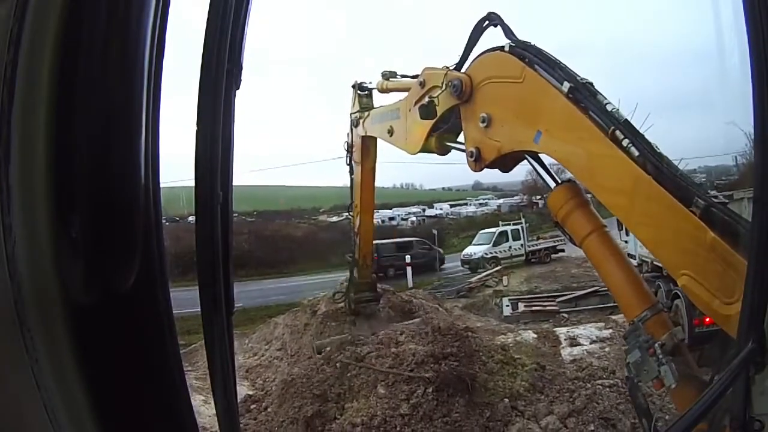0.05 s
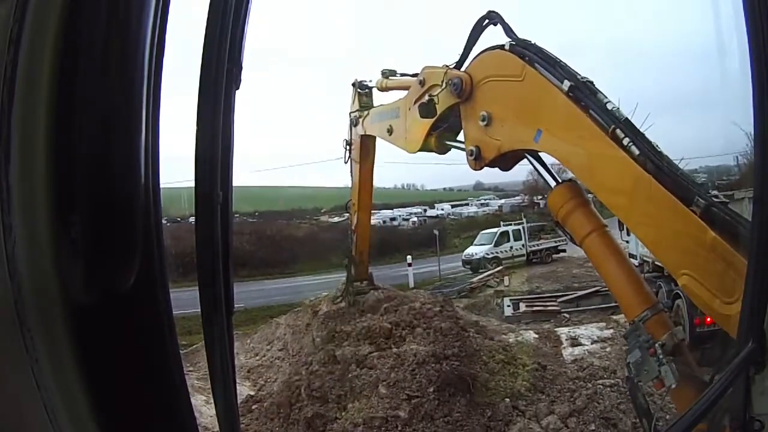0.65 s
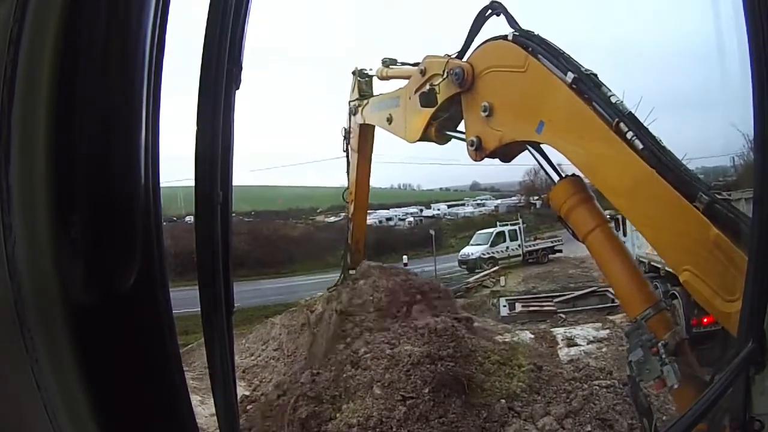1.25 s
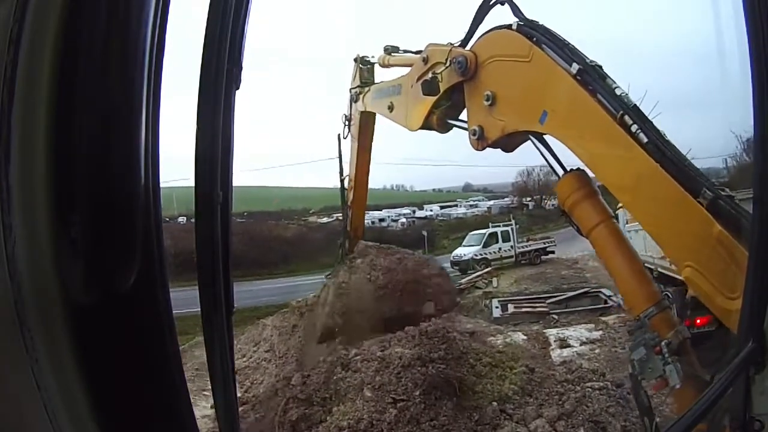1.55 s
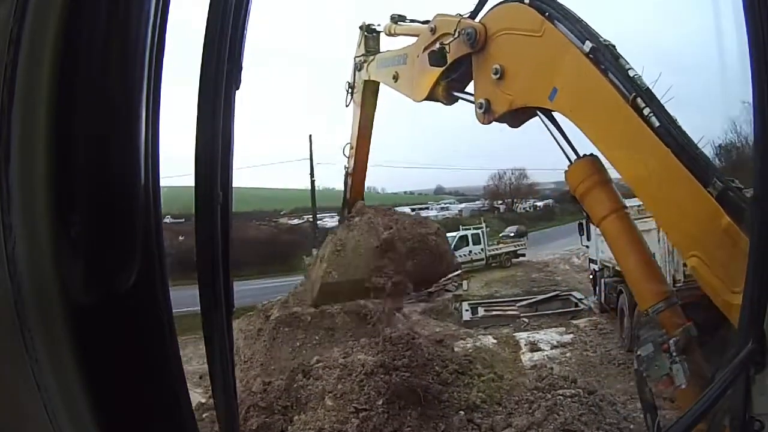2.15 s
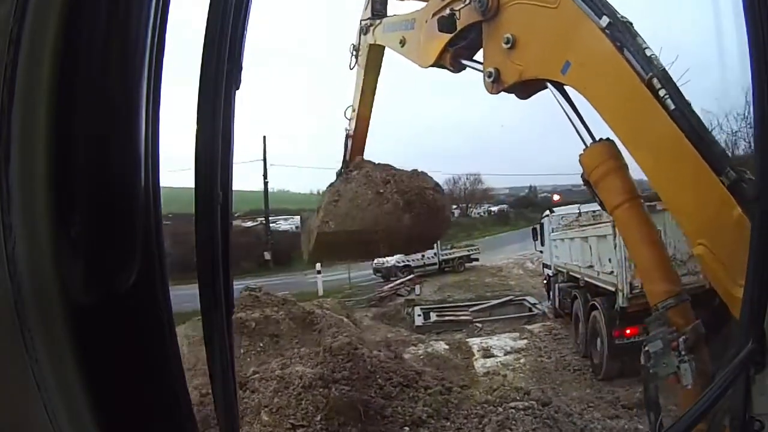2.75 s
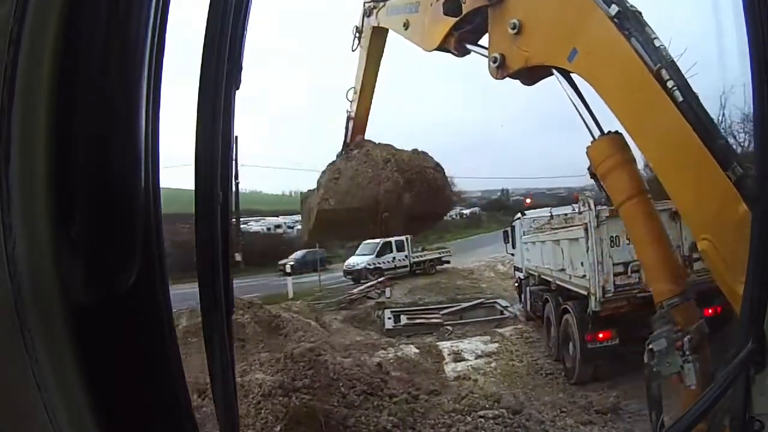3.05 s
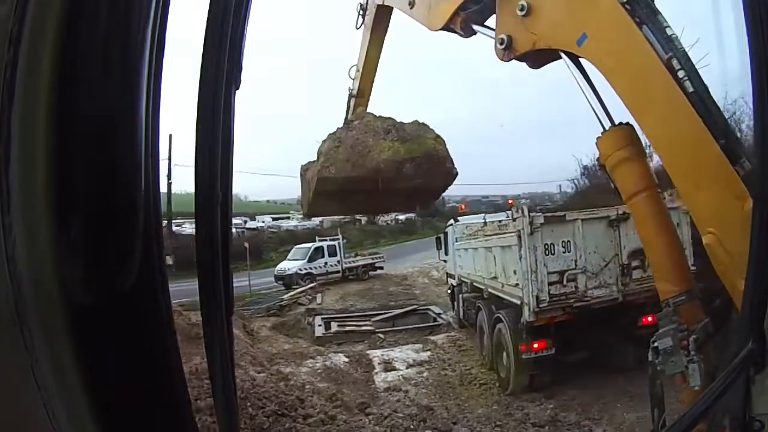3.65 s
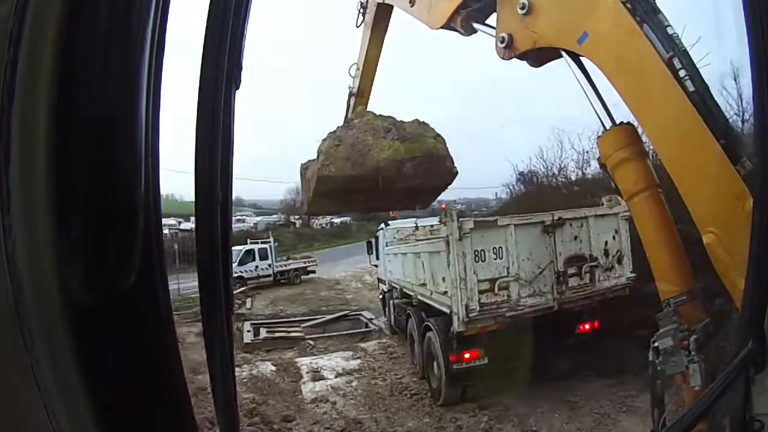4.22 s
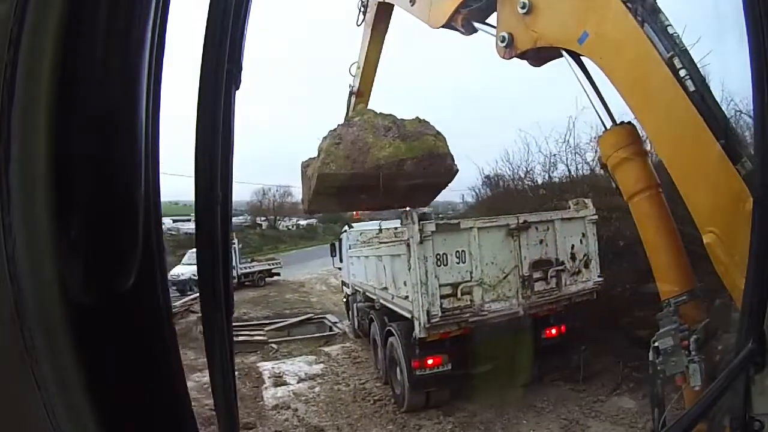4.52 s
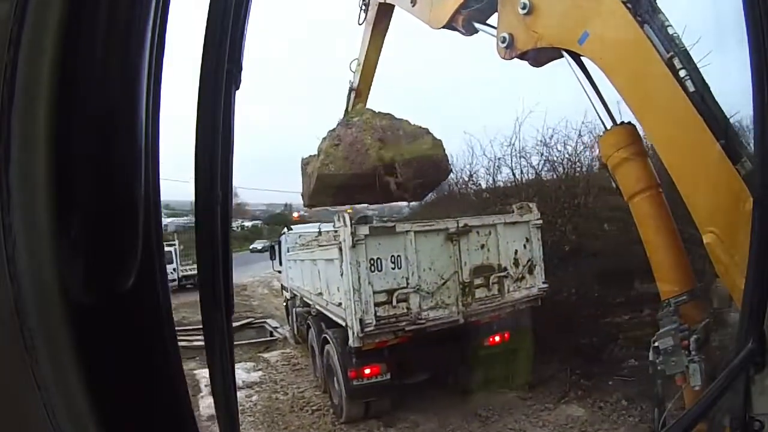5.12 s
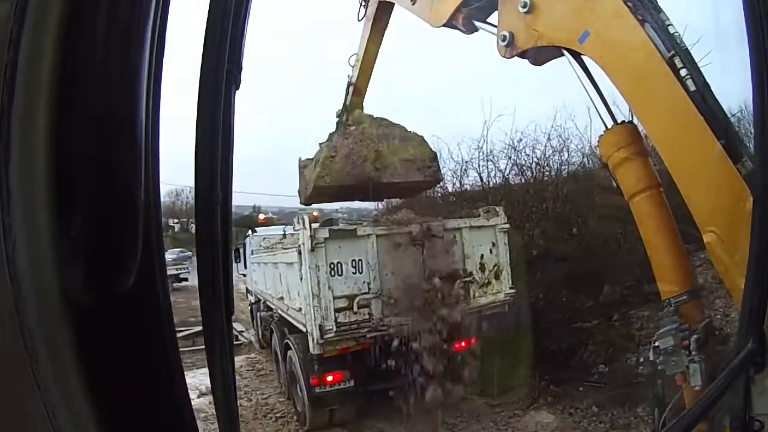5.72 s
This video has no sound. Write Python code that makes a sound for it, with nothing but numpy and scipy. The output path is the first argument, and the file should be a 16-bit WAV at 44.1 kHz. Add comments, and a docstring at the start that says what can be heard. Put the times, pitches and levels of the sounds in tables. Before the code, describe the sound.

A working excavator is heard from within its cab: a deep diesel hum, hydraulic whine and muffled engine clatter, wavering slightly under load. Dull metal knocks and booming jolts come at the start as it digs and lifts, then the sound settles through the swing. Late on, a valve spits, a dry joint squeaks and the first earth falls onto a truck with a low drumming.

```python
"""Inside an excavator cab

A wheeled excavator lifts a full bucket and swings it over a truck. A four-cylinder diesel near
1900 rpm, sagging under load, drives a whining piston pump and a seven-pulse hum. Four lever strokes
(dig, lift, swing, tip) load the hydraulics, and jolts set the cab booming and rumbling. Linkages
knock, valves spit, and a joint squeaks as the bucket tips and the first earth falls."""
import sys
import numpy as np
from scipy import signal
from scipy.fft import rfft, irfft
from scipy.io import wavfile
from scipy.ndimage import map_coordinates

SR = 44100
rng = np.random.default_rng(int(sys.argv[2]) if len(sys.argv) > 2 else 0)


def put_to_file(sound):
    """Save the sound as 16-bit audio at rate SR, in the file named by the first command-line argument."""
    columns = np.atleast_2d(sound).T  # one column per channel
    safe = np.clip(columns, -1, 1)
    whole_steps = np.round(safe * 32767)
    wavfile.write(sys.argv[1], SR, whole_steps.astype(np.int16))


N = 254898
T = np.arange(N) / SR
HZ = np.fft.rfftfreq(N, 1 / SR)
FIRINGS_PER_TURN, PUMP_PER_TURN, DRIVE_PER_TURN = 2, 12.2796, 7

# crankshaft speed: time_s, speed_hz
CRANK_SPEED = [(0.0, 31.62), (0.4, 31.72), (0.68, 32.23), (1.1, 31.46), (1.42, 31.28), (1.9, 31.67),
               (2.34, 31.55), (2.75, 31.67), (3.1, 31.57), (3.33, 31.8), (3.67, 31.95), (4.15, 31.63),
               (4.39, 31.62), (4.79, 31.99), (5.18, 31.76), (5.42, 31.81), (5.67, 32.43), (5.78, 32.45)]
# jolts that set the cab booming above the firing rate and the frame shaking:
# start_s, boom_db, boom_fade_db_per_s, above_hz, shake_db, shake_fade_db_per_s, tilt_db_per_octave
JOLTS = [(0.1, -27, 17, 6.8, -27, 20, 1.5), (0.86, -25, 11, 8.1, -39.5, 6.5, -1.5),
         (1.26, -26.5, 10.5, 6.45, -34, 11.5, 2.5), (4.38, -40, 6, 3.6, -39, 5.5, 0)]
# lever strokes: start_s, end_s, opening_s, closing_s
DIG, LIFT = (-0.31, 0.42, 0.029, 0.67), (0.67, 2.4, 0.42, 1.9)
SWING, TIP = (0.5, 4.35, 0.73, 0.3), (4.47, 4.74, 0.07, 2.2)


def amp(db):
    """Amplitude ratio of a level in decibels."""
    return np.exp(np.asarray(db) * (np.log(10) / 20))


def unit(x):
    """Normalisation to rms 1."""
    return x / np.sqrt(np.mean(abs(x) ** 2) + 1e-20)


def spectrum(points):
    """A spectral envelope in dB, interpolated on a log-frequency axis."""
    hz, db = np.transpose(points)
    return np.interp(np.log(HZ + 1), np.log(hz + 1), db)


def colour(x, db):
    """Filtering gives a white signal of rms 1 a spectral density in dB."""
    return irfft(rfft(x) * amp(db), N) * np.sqrt(SR / 2)


def noise(db):
    """Gaussian noise of a given spectral density."""
    return colour(rng.standard_normal(N), db)


def ringing(modes):
    """Random excitation of resonances with steep skirts."""
    power = sum(amp(db) ** 2 / (1 + ((HZ - hz) / (0.52 * width)) ** 2) ** 2 for hz, width, db in modes)
    return noise(10 * np.log10(power + 1e-20))


def drift(rate_hz):
    """Low-pass random fluctuation of rms 1."""
    size = 6000
    hz = np.fft.rfftfreq(size, T[-1] / size)
    slow = irfft(rfft(rng.standard_normal(size)) / (1 + (hz / rate_hz) ** 2), size)
    return np.interp(T, np.linspace(0, T[-1], size), unit(slow))


def tone(cycles, db, flutter, rate_hz):
    """A sinusoid with random amplitude and phase modulation."""
    phase = 2 * np.pi * (cycles + rng.random()) + flutter * drift(rate_hz)
    return amp(db) * (1 + flutter * drift(rate_hz)) * np.sqrt(2) * np.cos(phase)


def stroke(start_s, end_s, opening_s, closing_s):
    """A raised-cosine envelope: opens to 1, holds until end_s, then closes."""
    ramp = np.clip(np.minimum((T - start_s) / opening_s, 1 - (T - end_s) / closing_s), 0, 1)
    return np.sin(np.pi / 2 * ramp) ** 2


def jolted(blows, rest_db, rise_s=0.072):
    """Envelope of a damped vibration: each blow raises it, and it decays exponentially to a floor."""
    swells = [np.clip((T - s) / rise_s, 0, 1) * amp(db - fade * np.maximum(T - s, 0))
              for s, db, fade in blows]
    return np.maximum(np.max(swells, axis=0), amp(rest_db))


def engine(crank, lugging):
    """Periodic forcing: firing, shafts and gears sound at fixed multiples of the crank speed."""
    # engine and gear tones: order, level_db
    orders = [(1, -41.4), (2, -23.2), (3, -57.8), (3.5, -60.6), (4, -49.6), (5, -60.6), (5.5, -60.7),
              (6, -60.7), (6.5, -51.0), (8, -51.8), (11, -61.4), (12, -49.8), (13, -58.8), (13.3, -49.5),
              (20, -56.6), (23, -65.8), (24, -53.6), (25, -64.7), (26, -64.8), (31, -63.6), (34, -73.9),
              (39, -71.4), (40, -68.1), (40.5, -71.5), (42.5, -71.5), (44, -59.6), (48, -69.9), (53, -63.1),
              (57.08, -69.9), (61, -76.0), (69, -77.5)]
    out = np.zeros(N)
    for order, db in orders:
        if order == FIRINGS_PER_TURN:
            level = amp(db + 0.2 - 2 * lugging) * (1 + 0.09 * drift(11))
            out += level * np.sqrt(2) * np.cos(2 * np.pi * order * crank)
        else:
            out += tone(order * crank, db - 0.2, flutter=0.15, rate_hz=4.6)
    return out


def cab_boom(crank, antiphase_s=1.262):
    """Beating: each jolt renews a boom just above the firing note, and the two throb together."""
    starts, boom_db, fades, above_hz = np.transpose(JOLTS)[:4]
    latest = np.maximum(np.searchsorted(starts, T) - 1, 0)
    slip = np.cumsum(above_hz[latest]) / SR
    slip -= np.interp(antiphase_s, T, slip)
    envelope = jolted(zip(starts, boom_db, fades), rest_db=-42)
    return -envelope * np.sqrt(2) * np.cos(2 * np.pi * (FIRINGS_PER_TURN * crank + slip))


def hydraulics(crank, speed_hz, labouring, lugging):
    """Pressure ripple: piston strokes give two harmonic series whose low members follow the load."""
    # main pump tones: harmonic, level_db
    pump = [(1, -32.6), (2, -51.7), (5, -73.2), (6, -72.7), (10, -85.7)]
    # seven-piston drive tones: harmonic, level_db
    drive = [(1, -41.7), (2, -41.9), (3, -42.4), (4, -52.3), (5, -71.7), (6, -65.9), (8, -72.4),
             (11, -77.7)]
    # gains of the pump's fundamental and the drive's first three harmonics, a row each:
    # unloaded_db, labouring_db, lugging_db, digging_db, lifting_db, tipping_db
    load_response = [(0.7, -0.2, 2, -3, -1.66, -1), (-3, 0, -1.5, -1.5, 5.5, -0.4),
                     (4, -0.9, 2, -3.5, -6.5, -2), (-9, 9, 1.9, 1.5, 2, -5)]
    pump_cycles, drive_cycles = PUMP_PER_TURN * crank, DRIVE_PER_TURN * crank
    work = np.array([np.ones(N), labouring, lugging, stroke(*DIG), stroke(*LIFT), stroke(*TIP)])
    pump_db, *drive_db = np.array(load_response) @ work
    pickup_db = 8 * np.maximum(speed_hz - 31.8, 0)
    fundamental_db = pump[0][1] + pump_db + pickup_db + 0.18 * drift(2)
    out = tone(pump_cycles, fundamental_db, flutter=0.087, rate_hz=27)
    for k, db in pump[1:]:
        out += tone(k * pump_cycles, db + 0.15, flutter=0.14, rate_hz=4.2)
    for (k, db), load_db in zip(drive, drive_db):
        out += tone(k * drive_cycles, db + load_db, flutter=0.081, rate_hz=3.7)
    for k, db in drive[len(drive_db):]:
        out += tone(k * drive_cycles, db - 0.2, flutter=0.24, rate_hz=2.0)
    # oil forced through the valve rasps around the drive's third harmonic and fades with it
    return out + ringing([(648, 28, -67.5)]) * amp(0.23 * drive_db[-1])


def whine(crank, speed_hz, in_phase_s=3.03):
    """Beating of the pump's 4th harmonic with the drive's 7th, loudest at a panel resonance."""
    turns = crank - np.interp(in_phase_s, T, crank)
    pump_cycles, drive_cycles = 4 * PUMP_PER_TURN * turns, 7 * DRIVE_PER_TURN * turns
    pair = amp(-58) * np.cos(2 * np.pi * pump_cycles)
    pair += amp(-62) * np.cos(2 * np.pi * drive_cycles + 0.44 * drift(3.3))
    resonance_db = 4 * np.exp(-((speed_hz - 31.92) / 0.2) ** 2)
    # the pump's 8th harmonic whistles as the engine picks up
    pickup = np.tanh(2 * (speed_hz - speed_hz.mean()))
    whistle = tone(2 * pump_cycles, -71 + 4 * pickup, flutter=0.042, rate_hz=8)
    return np.sqrt(2) * pair * amp(resonance_db + 1.2 * drift(7)) + whistle


def clatter(crank):
    """Cyclic noise of valve gear and combustion: part repeats every two turns, part is random."""
    # clatter through the cab walls: frequency_hz, density_db
    transmitted = [(20, -77), (80, -74.5), (160, -89), (330, -76.5), (500, -81.5), (950, -82),
                   (1150, -92.5), (1750, -90.5), (2400, -89), (3000, -101), (4600, -103), (6500, -106),
                   (8200, -111), (14000, -118)]
    # panel and air resonances: centre_hz, width_hz, gain_db
    panels = [(389, 22, 17.5), (435, 30, 15.5), (531.4, 33, 8), (690, 45, 7), (816, 50, 0.5), (920, 150, 3),
              (1330, 220, 11), (1622, 190, 8.5), (1947, 95, 7.5), (2109, 80, 6.5), (3172, 66, 9.5),
              (3846, 110, 9.5), (14300, 300, 5)]
    cycle = rng.standard_normal(2780)
    repeating = unit(map_coordinates(cycle, [crank / 2 % 1 * len(cycle)], order=3, mode="grid-wrap"))
    fresh = rng.standard_normal(N) * (1 + 0.066 * np.cos(2 * np.pi * FIRINGS_PER_TURN * crank))
    panel_db = sum(gain * np.exp(-2 * ((HZ - hz) / width) ** 2) for hz, width, gain in panels)
    db = spectrum(transmitted) + panel_db
    repeating_share = 0.45 / (1 + (HZ / 2500) ** 2)  # the treble loses the pattern
    sound = colour(repeating, db + 10 * np.log10(repeating_share + 1e-9))
    sound += colour(fresh, db + 10 * np.log10(1 - repeating_share))
    return sound * amp(0.21 + 0.6 * stroke(*DIG) + 0.5 * drift(18))


def rumble():
    """Forced vibration: the shaking frame drives the cab's low modes; sharp jolts favour the higher."""
    # low cab resonances: pitch_hz, width_hz, gain_db
    cab_modes = [(24.5, 15, -17), (42.37, 21, 3), (103.7, 19, -8.5), (207.8, 22, -14)]
    out = np.zeros(N)
    for hz, width, db in cab_modes:
        octaves = np.log2(hz / 100)
        blows = [(s, shake_db + tilt * octaves, fade) for s, *_, shake_db, fade, tilt in JOLTS]
        mode = tone(hz * T + 0.17 * drift(width / 2), db, flutter=0.18, rate_hz=width / 2)
        out += mode * jolted(blows, rest_db=-46)
    return out


def oil_lines():
    """Flow-excited resonance: moving oil churns in the hoses and makes the steel lines ring."""
    # boom and slewing circuit resonances: centre_hz, width_hz, density_db
    hose_modes = [(807, 52, -76.5), (907, 41, -76), (976, 33, -73.5), (1113, 29, -79.5)]
    # steel line resonances: centre_hz, width_hz, density_db
    pipe_modes = [(3370, 18, -95), (4030, 40, -102), (4490, 310, -101), (5400, 110, -105), (6060, 86, -104),
                  (6400, 73, -101), (6930, 73, -109)]
    flow = amp(-18.5) + amp(-4.5) * stroke(*DIG) + stroke(*SWING)
    return ringing(hose_modes) * flow + ringing(pipe_modes) * amp(1.5 * drift(10))


def valves():
    """Throttling noise: oil spits as a spool opens and rushes through the bucket valve."""
    # oil rush: frequency_hz, density_db
    rush = [(20, -130), (2000, -108), (4000, -105), (6200, -100), (7800, -111), (12000, -115),
            (15000, -125)]
    # valve spits: start_s, gain_db, length_s, tilt_db_per_octave
    spits = [(0.24, 4.5, 0.026, 10), (0.524, 3, 0.01, -14), (4.516, 12, 0.02, -4.5)]
    flow = amp(-32) + amp(-19) * stroke(*DIG) + amp(-2.5) * stroke(*TIP)
    out = noise(spectrum(rush)) * flow
    octaves = np.log2(np.maximum(HZ, 1500) / 6000)
    for start_s, db, length_s, tilt in spits:
        age = np.maximum(T - start_s, 0)
        gate = (1 - np.exp(-age / 0.0011)) / (1 + (age / length_s) ** 4)
        hiss = noise(spectrum(rush) + db + tilt * octaves)
        grit = amp(2.5 * drift(400))
        out += hiss * gate * grit
    return out


def knocks():
    """Impact excitation: slack in the pins closes with a dull thump and a short ring of steel."""
    # linkage impacts: start_s, gain_db, t60_s, treble_tilt_db_per_octave
    impacts = [(0, 23, 0.039, 5), (.145, 13.5, 0.078, -4.5), (0.248, 10, 0.15, 0), (.35, 1, 0.054, -7),
               (1.421, 8, 0.059, -9), (4.519, 5.5, .1, -1), (5.615, 5, .16, -7)]
    # thump of the linkage: frequency_hz, density_db
    linkage = [(20, -94), (200, -70.5), (600, -83), (1000, -78), (1600, -79), (2100, -82), (2900, -95.5),
               (6000, -106), (14000, -120)]
    # modes of its steel: pitch_hz, level_db, t60_s
    steel_modes = [(993, -57, .18), (1963, -61, .16)]
    out = np.zeros(N)
    octaves = np.log2(np.maximum(HZ, 2000) / 2000)
    for start_s, db, t60_s, tilt in impacts:
        sounding = (T >= start_s) & (T < start_s + 0.5)
        age = T[sounding] - start_s
        thump = noise(spectrum(linkage) + tilt * octaves)[sounding] * amp(-60 * age / t60_s)
        ring = sum(amp(level - 60 * age / ring_s) * np.sin(2 * np.pi * hz * age)
                   for hz, level, ring_s in steel_modes)
        out[sounding] += amp(db) * (thump + ring) * np.minimum(age / 0.004, 1)
    return out


def thuds(pitch_hz=42):
    """Damped free vibration: jolts through the boom set a low cab mode swinging."""
    # blows as the bucket tears free: start_s, level_db, t60_s
    blows = [(0.14, -21, 0.39), (0.188, -21, .3), (0.268, -15, .5), (0.948, -24.5, .45), (1.16, -20.5, .35)]
    out = np.zeros(N)
    for start_s, db, t60_s in blows:
        age = np.maximum(T - start_s, 0)
        envelope = amp(db - 60 * age / t60_s) * np.minimum(age / 0.016, 1)
        out -= envelope * np.sin(2 * np.pi * pitch_hz * age)
    return out


def clods():
    """Impact and friction noise: earth drums unevenly on the truck and hisses off the bucket."""
    # drumming of the truck bed: frequency_hz, density_db
    truck_bed = [(20, -76), (110, -77.5), (190, -58), (300, -75.5), (600, -89), (2000, -93), (6000, -110),
                 (14000, -120)]
    # hiss of sliding earth: frequency_hz, density_db
    sliding = [(20, -130), (2000, -112), (6000, -105), (8000, -113), (15000, -124)]
    spill = stroke(start_s=5.5, end_s=6, opening_s=0.078, closing_s=0.1)
    return (noise(spectrum(truck_bed)) + noise(spectrum(sliding))) * spill * amp(-2 + 1.9 * drift(30))


def squeak():
    """Stick-slip friction: a dry joint sings twice, rough and falling in pitch, with a faint octave."""
    # slips of a bucket joint: start_s, length_s, start_hz, end_hz, level_db
    slips = [(5.629, 0.0426, 6400, 6160, -55), (5.65, .062, 6040, 5600, -62)]
    out = np.zeros(N)
    for start_s, length_s, start_hz, end_hz, db in slips:
        progress = np.clip((T - start_s) / length_s, 0, 1)
        pitch_hz = (start_hz + (end_hz - start_hz) * progress) * (1 + 0.012 * drift(200))
        cycles = np.cumsum(pitch_hz) / SR
        rasp = 1 + 0.4 * drift(300)
        song = tone(cycles, db, flutter=0.24, rate_hz=120)
        song += tone(2 * cycles, db - 21, flutter=0.44, rate_hz=120)
        out += np.sin(np.pi * progress) * rasp * song
    return out


def scene():
    """Superposition of all sources; everything that turns is geared to one crankshaft."""
    speed_hz = np.interp(T, *np.transpose(CRANK_SPEED))
    crank = np.cumsum(speed_hz) / SR  # angle in turns
    # as its speed sags, the engine first labours, then lugs
    labouring = np.clip((31.9 - speed_hz) / 0.21, 0, 1)
    lugging = np.clip((31.58 - speed_hz) / 0.24, 0, 1)
    machine = engine(crank, lugging) + cab_boom(crank) + hydraulics(crank, speed_hz, labouring, lugging)
    machine += whine(crank, speed_hz) + clatter(crank) + rumble()
    return (machine + oil_lines() + valves() + knocks() + thuds() + squeak() + clods())[None]


def record(dry, cutoff_hz=15000):
    """Band limiting by a low-pass filter, with 2 ms fades at both ends."""
    fade = np.minimum(1, np.minimum(T, T[-1] - T) / 0.002)
    lowpass = signal.firwin(511, cutoff_hz, window=("kaiser", 9), fs=SR)
    return signal.oaconvolve(dry * fade, lowpass[None], "same")


dry = scene()
out = record(dry)
put_to_file(out)
```